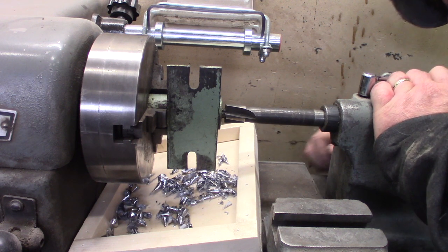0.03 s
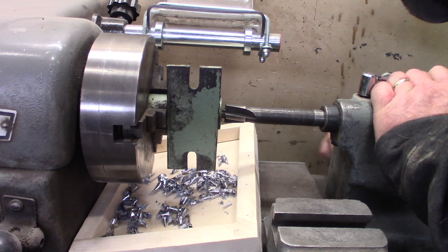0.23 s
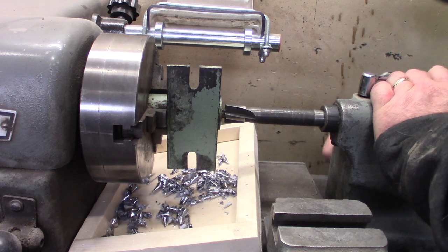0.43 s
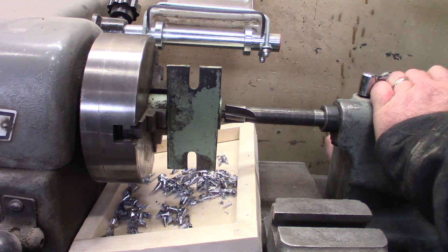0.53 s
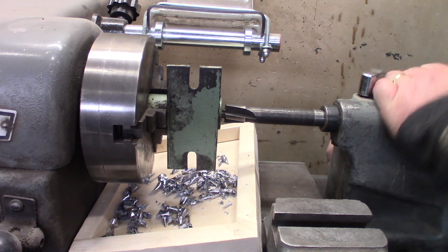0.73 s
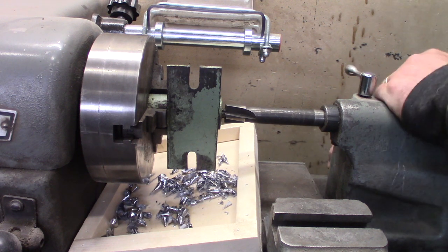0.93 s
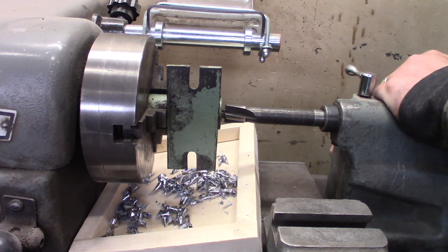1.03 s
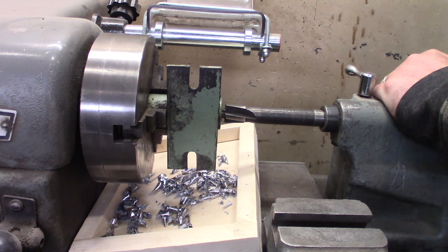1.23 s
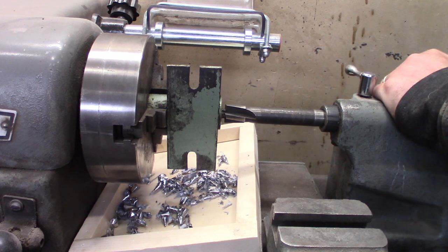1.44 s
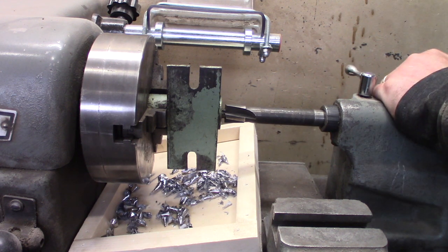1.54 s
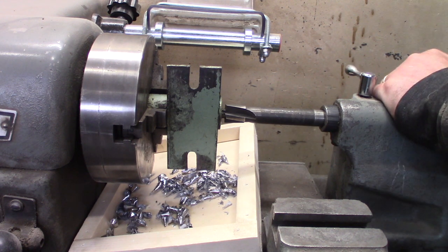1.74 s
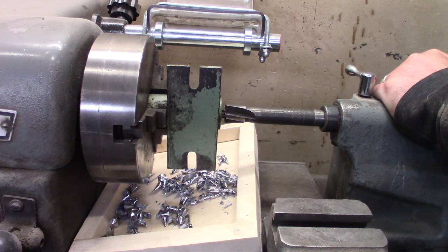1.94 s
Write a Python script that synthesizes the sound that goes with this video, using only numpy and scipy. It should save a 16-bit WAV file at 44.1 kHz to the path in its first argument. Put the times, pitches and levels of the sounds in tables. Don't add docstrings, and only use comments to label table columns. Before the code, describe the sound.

A metal lathe lever snaps over with a sharp ringing clack, then faint scrapes and ticks

```python
import sys
import numpy as np
from scipy import signal
from scipy.fft import rfft, irfft, next_fast_len
from scipy.io import wavfile
from scipy.ndimage import map_coordinates

SR = 44100
rng = np.random.default_rng(int(sys.argv[2]) if len(sys.argv) > 2 else 0)


def digitize_waveform(pressure):
    field = np.atleast_2d(pressure).T
    bounded = np.clip(field, -1, 1)
    quanta = np.round(bounded * 32767).astype(np.int16)
    wavfile.write(sys.argv[1], SR, quanta)


def boost(x):
    u = np.asarray(x, float) / 20
    return 10 ** u


N = 88200

# frequency in Hz, level in dB.
TICK_COLOUR = [(100, -33.5), (470, -5), (1200, -5), (3000, -6), (9000, -20), (15000, -48)]


def unit(x):
    return x / np.sqrt(np.mean(x ** 2) + 1e-20)


def along(points, hz):
    f, v = np.transpose(points)
    return np.interp(np.log(hz + 1), np.log(f + 1), v)


def envelope(rows):
    s, db = np.transpose(rows)
    return boost(np.interp(np.arange(N) / SR, s, db, -120, -120))


def wobble(rate):
    knots = rng.standard_normal(int(N * rate / SR) + 4)
    return map_coordinates(knots, [np.arange(N) * rate / SR])


def filtered(x, response):
    m = next_fast_len(x.shape[-1] + 8192)
    spectrum = rfft(x, m) * response(np.fft.rfftfreq(m, 1 / SR))
    return irfft(spectrum, m)[..., :x.shape[-1]]


def resonance(hz, centre, width):
    return 1 / (1 + ((hz - centre) / width * 2) ** 2)


def pair(alike, size):
    def mid_and_side(hz):
        turn = np.arccos(np.clip(along(alike, hz), -1, 1)) / 2
        return np.array([np.cos(turn), np.sin(turn)])

    mid, side = filtered(rng.standard_normal((2, size)), mid_and_side)
    return np.array([mid + side, mid - side])


def struck(contacts, modes, colour, dense_db, attack_s, shorter, scatter_db, pivot_hz=2000, count=240):
    # frequency in Hz, t60 in seconds.
    dense_t60 = [(150, .2), (700, 0.12), (3000, 0.074), (8000, 0.035), (15000, 0.037)]
    detune = 0.003
    out = np.zeros(N + SR)
    t = np.arange(SR // 6)[:, None] / SR
    attack = 1 - np.exp(-t[:, 0] / attack_s)
    hz, db, t60 = np.transpose(modes)
    for s, peak_db, bright in contacts:
        place, phase = rng.uniform(size=(2, count))
        own_level, own_pitch = rng.standard_normal((2, len(hz)))
        crowd = 150 * 100 ** ((np.arange(count) + place) / count)
        crowd_db = along(colour, crowd) + 10 * np.log10(crowd / 3000) + dense_db
        f = np.r_[hz * (1 + detune * own_pitch), crowd]
        start_db = np.r_[db + scatter_db * own_level, crowd_db] + bright * np.log2(f / pivot_hz)
        fall = 60 / np.r_[t60, shorter * along(dense_t60, crowd)]
        decay = np.exp(-np.log(10) / 20 * fall * t)
        ring = decay * np.sin(2 * np.pi * (f * t + np.r_[0 * hz, phase]))
        out[round(s * SR):][:len(t)] += ring @ boost(start_db + peak_db - 6) * attack
    return out[:N]


def lever():
    # start in seconds, peak in dB, brightness in dB per octave.
    lead_in = [
        (.2136, -22.5, 1),
        (.2195, -29.5, 2),
    ]
    snap = [
        (.2252, -8.5, 2),
        (.2290, -17.5, 4),
        (.2321, -17.5, -0.5),
        (.2445, -31, -2.5),
        (.4005, -38.5, -1.5),
        (.4095, -41, -2.5),
    ]
    rebound = [
        (.4303, -23, 1),
        (.4345, -25.5, -2),
        (.4400, -53.5, -11.5),
    ]
    # Hz, level in dB, t60 in seconds.
    caught = [(455, -12, .06), (712, -2, .06), (755, -5, 0.05), (1430, -5, 0.09), (1676, -8, 0.085),
              (1940, -5, .05), (2062, -9, 0.11), (2175, -7, .04), (2272, -2, 0.035),
              (3675, -6, .045), (4215, -2, .04), (4470, -3, .033), (4655, -2, .045), (5000, -5, .033),
             (5172, -7, .06), (5345, -4, .033), (5610, -8, .06), (5785, -9, .05), (6150, -10, .04),
             (7876, -16, .045), (8796, -17, .06), (10500, -16, .045)]
    loose = [(2156, -1.5, 0.0306), (4740, -4.5, 0.026), (5140, -3, 0.027), (6900, -12, .02),
             (7360, -8, 0.034)]
    free = [(2175, 1, 0.055), (2350, 1, 0.03), (2541, 1, 0.04), (2720, -4, .03), (4280, -5, .03),
            (4450, -6, .03), (4900, -6, .03), (5152, -4, 0.04), (7230, -12, .022), (1500, -15, 0.1),
            (325, -16, 0.13), (450, -18, .06)]
    # frequency in Hz, level in dB.
    snap_colour = [(200, -16), (480, -15.5), (1050, -22), (2150, -8.5), (3000, -16.5), (4700, -14.5),
                   (10000, -19.5), (15500, -52)]
    rebound_colour = [(150, -24), (400, -17), (1270, -14.5), (2500, -1), (3300, -15), (5000, -14),
                      (7800, -19), (15000, -50)]
    return (struck(snap, caught, snap_colour, dense_db=-5, attack_s=0.00068, shorter=1.36, scatter_db=1)
            + struck(lead_in, loose, snap_colour, dense_db=-8, attack_s=0.0012, shorter=0.86,
                     scatter_db=2.5, count=160)
            + struck(rebound, free, rebound_colour, dense_db=-8.5, attack_s=0.001, shorter=1,
                     scatter_db=3, count=160))


def casting_knocks():
    # start in seconds, peak in dB, brightness in dB per octave.
    nudges = [
        (.7166, -32, 0),
        (.7262, -42, 0),
    ]
    stops = [
        (.846, -41, -4),
        (.853, -53, -1),
        (.860, -40, -3),
        (.869, -47, -3),
        (.878, -54, -6),
    ]
    # Hz, level in dB, t60 in seconds.
    casting = [(306, -4, 0.05), (715, 1, 0.074), (790, -2, 0.034), (910, -6.5, .035), (1620, -7, 0.033)]
    ways = [(740, 0, 0.035), (950, 0, .03), (1120, 2, 0.03), (1220, 1, 0.03), (1550, -4, .04)]
    return (struck(nudges, casting, TICK_COLOUR, dense_db=-12, attack_s=.0004, shorter=.4,
                   scatter_db=1, pivot_hz=700, count=60)
            + struck(stops, ways, TICK_COLOUR, dense_db=-7, attack_s=0.0018, shorter=0.74,
                     scatter_db=7.5, pivot_hz=1200, count=60))


def rubbing(pressure, colour, rings, grit_db, uneven_db):
    grains = rng.standard_normal(N) * boost(grit_db * wobble(1000) + uneven_db * wobble(44.9))

    def response(f):
        peaks = 1 + sum(boost(db) * resonance(f, c, w) for c, w, db in rings)
        return boost(along(colour, f)) * peaks

    return unit(filtered(grains, response)) * envelope(pressure)


def slide():
    # time in seconds, level in dB.
    push = [(0.708, -55), (.722, -51.5), (0.769, -48.5), (.805, -46), (.845, -48.5), (.875, -53),
            (.89, -59), (0.949, -86)]
    # frequency in Hz, level in dB.
    body_colour = [(120, -23), (200, -3.5), (900, -3), (1500, -4.5), (2600, -6.5), (5000, -12), (8000, -28),
                   (15500, -66)]
    hiss_colour = [(2000, -36.5), (5000, -12.5), (8500, -3.5), (11500, -11.5), (15500, -32.5)]
    # centre in Hz, width in Hz, level in dB.
    slide_rings = [(1120, 300, -8.5), (3650, 190, 1), (5700, 500, 1), (8360, 3000, -4)]

    def follow(grows, full_db=-48):
        return [(s, full_db + grows * (db - full_db)) for s, db in push]

    body = rubbing(follow(0.66), body_colour, slide_rings, grit_db=0.5, uneven_db=1.5)
    hiss = rubbing(follow(2.4), hiss_colour, slide_rings, grit_db=0.5, uneven_db=0.5)
    return boost(0.5) * body + boost(-2.5) * hiss


def reamer():
    # start in seconds, peak in dB, brightness in dB per octave.
    ticks = [
        (1.1395, -43, -2),
        (1.1512, -40, 2.5),
        (1.1585, -43, 0),
        (1.1660, -48, -5),
        (1.1770, -48, -5),
        (1.1845, -45, 0),
        (1.1875, -38, 2),
        (1.1893, -36, -1),
        (1.1925, -43, -5),
        (1.2020, -47, -1),
    ]
    chirps = [
        (1.162, -62, 0),
        (1.1755, -43, 0),
        (1.180, -49, -3),
    ]
    # Hz, level in dB, t60 in seconds.
    plate = [(496, -6, 0.04), (1270, 0, 0.04), (2320, 1, .035), (2960, -4, 0.03), (3950, -9, .025),
             (6890, -9, .02)]
    flute = [(6050, 1, .06), (7040, 3, 0.037)]
    # time in seconds, level in dB.
    grate = [(1.085, -68), (1.12, -56.5), (1.14, -49), (1.17, -49), (1.2, -47), (1.225, -58), (1.27, -80)]
    # frequency in Hz, level in dB.
    grate_colour = [(100, -35), (250, 0.5), (500, 0), (1200, -1), (2300, -6), (4000, -13), (6800, -15),
                    (15000, -43)]
    grate_rings = [(502, 230, 2.97), (1260, 294, 0)]  # Hz, width Hz, dB
    return (struck(ticks, plate, TICK_COLOUR, dense_db=-3.5, attack_s=0.00031, shorter=0.32,
                   scatter_db=2.5, count=120)
            + struck(chirps, flute, TICK_COLOUR, dense_db=-20, attack_s=.001, shorter=.4,
                     scatter_db=0, pivot_hz=6000, count=30)
            + rubbing(grate, grate_colour, grate_rings, grit_db=-0.5, uneven_db=1.5))


def bed_thumps():
    # start in seconds, peak in dB, brightness in dB per octave.
    shudder = [
        (.262, -39, -8),
        (.290, -44, -12),
    ]
    thumps = [
        (.012, -48, 5),
        (.045, -45, 4),
        (1.480, -50, 1),
        (1.884, -44, -0.5),
        (1.968, -42, 6.5),
        (1.9758, -35.5, 9),
        (1.979, -32.5, 4.5),
        (1.9832, -34, -1),
    ]
    # frequency in Hz, level in dB, t60 in seconds.
    bed_modes = [(99, -9.5, 0.1205), (187.5, -10, 0.22), (244, 3.5, 0.14), (463, -9.5, 0.1),
                 (716, -1, 0.029)]
    # frequency in Hz, level in dB.
    palm_colour = [(100, -10), (500, 0), (1000, -8), (2000, -50), (15000, -90)]
    return struck(shudder + thumps, bed_modes, palm_colour, dense_db=-12, attack_s=0.0042, shorter=0.36,
                  scatter_db=4.5, pivot_hz=252, count=30)


def sleeve():
    # time in seconds, level in dB.
    rustle = [(0, -50.5), (.08, -55), (.2, -59), (.5, -57), (.65, -53), (.93, -55), (1, -61), (1.07, -60),
              (1.55, -73.5), (1.64, -64.5), (1.75, -66), (2, -61.5)]
    # frequency in Hz, level in dB.
    rustle_colour = [(88, -33.5), (150, -15.5), (268, -11), (966, -13), (1040, -15.5), (1760, -22),
                     (2230, -20), (8010, -29.5), (15500, -40.5)]
    rustle_rings = [(243.3, 61, 6.8), (5800, 870, 2.76), (7970, 1200, 3)]  # Hz, width Hz, dB
    return rubbing(rustle, rustle_colour, rustle_rings, grit_db=2.5, uneven_db=1)


def bench(x):
    # frequency in Hz, level in dB.
    bench_colour = [(200, -24.5), (1000, -36.5), (2500, -16), (6000, -19), (14000, -16)]
    t = np.arange(SR // 20) / SR
    echo = rng.standard_normal(len(t)) * boost(-60 * t / 0.011)
    reflected = signal.fftconvolve(x, echo / np.linalg.norm(echo))[:N]
    side = filtered(reflected, lambda f: boost(along(bench_colour, f)))
    return np.array([side, -side])


def shop(x):
    # frequency in Hz, t60 in seconds.
    shop_t60 = [(100, 0.25), (500, 0.45), (1400, 0.91), (2200, 1.0), (3300, 0.99), (5000, 1), (9000, 0.41),
                (15000, 0.44)]
    # frequency in Hz, level in dB.
    shop_colour = [(110, 6), (600, -3), (1400, -2), (2100, -4), (3200, -0.5), (4600, -6.5), (7000, -5),
                   (15000, -8)]
    # frequency in Hz, left-right likeness (0 to 1).
    shop_alike = [(100, 1), (700, 1), (3000, 0.95), (12000, 0.92)]
    wall_s, scatter = .012, 1.6
    hz, t, z = signal.stft(pair(shop_alike, SR), SR, nperseg=256)
    tail_db = along(shop_colour, hz)[:, None] - 60 * t / along(shop_t60, hz)[:, None]
    tail = signal.istft(z * boost(tail_db), SR, nperseg=256)[1]
    blurred = x * (1 + scatter * wobble(1200)) / np.hypot(1, scatter)
    delayed = np.pad(blurred, (round(wall_s * SR), 0))
    return signal.fftconvolve(delayed[None], tail / np.linalg.norm(tail[0]), axes=1)[:, :N]


def air():
    # frequency in Hz, level in dB.
    air_colour = [(25, -46.5), (55, -13.5), (190, -4.5), (500, -10), (900, -13), (6800, -26.5),
                  (10500, -30), (15600, -48)]
    # frequency in Hz, left-right likeness (0 to 1).
    air_alike = [(60, 0.55), (380, 0.42), (2380, 0.7), (15000, 0.87)]
    # centre in Hz, width in Hz, level in dB.
    hum_bands = [(114, 5.5, -76), (263, 20, -70.5), (480.6, 62, -66.5)]
    floor = unit(filtered(pair(air_alike, N), lambda f: boost(along(air_colour, f))))
    out = floor * boost(-57.5 + .8 * wobble(4.23))
    for c, w, db in hum_bands:
        band = filtered(rng.standard_normal(N), lambda f: resonance(f, c, w))
        out = out + boost(db) * unit(band)
    return out


def scene():
    snap = lever()
    small = casting_knocks() + slide() + reamer() + bed_thumps() + sleeve()
    near = snap * boost([[.2], [-.2]]) + small * boost([[.25], [-.25]])
    heard = near + bench(snap + small) + boost(-17) * (shop(snap) + shop(small))
    low_hz = 62
    return filtered(heard, lambda f: (1j * f / (low_hz + 1j * f)) ** 3) + air()


def low_pass(x):
    return signal.sosfilt(signal.butter(12, 15780, fs=SR, output="sos"), x)


def record(dry):
    limited = filtered(dry, lambda hz: hz < 15740)
    return low_pass(limited)


dry = scene()
out = record(dry)
digitize_waveform(out)
```